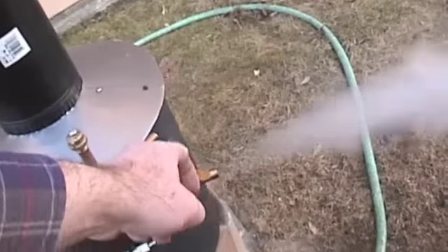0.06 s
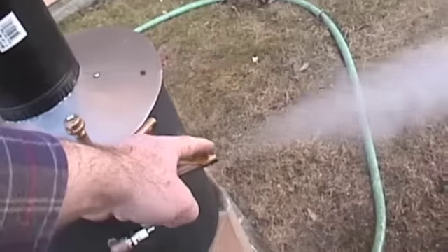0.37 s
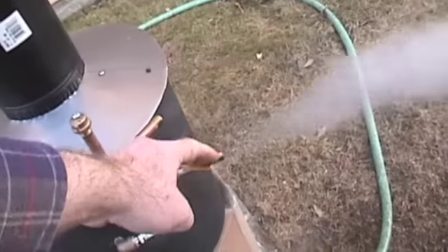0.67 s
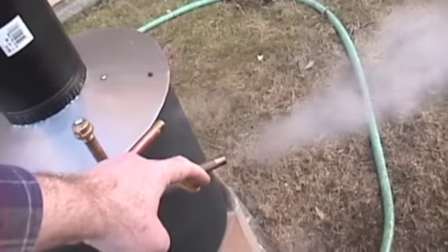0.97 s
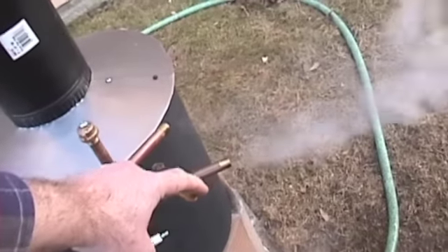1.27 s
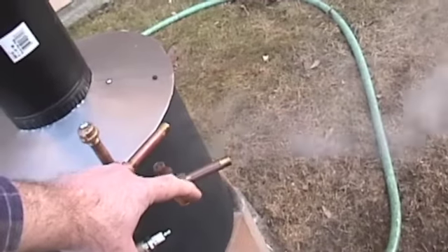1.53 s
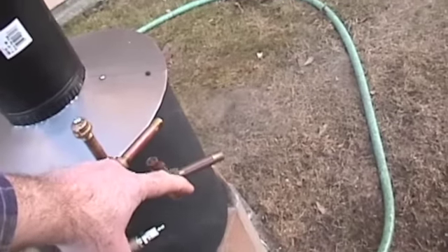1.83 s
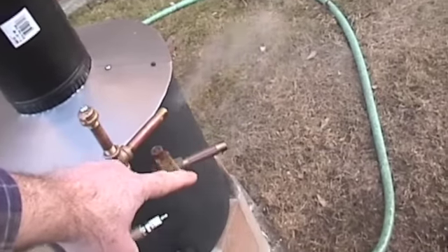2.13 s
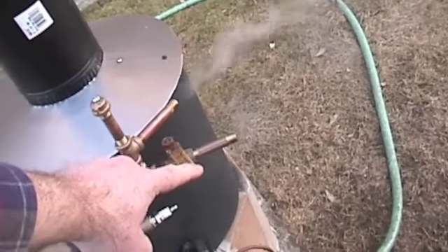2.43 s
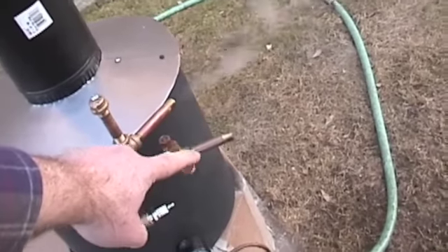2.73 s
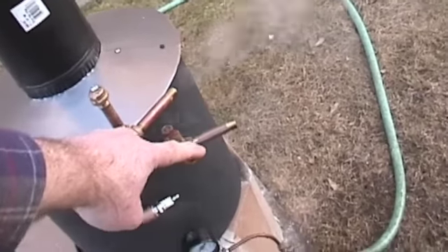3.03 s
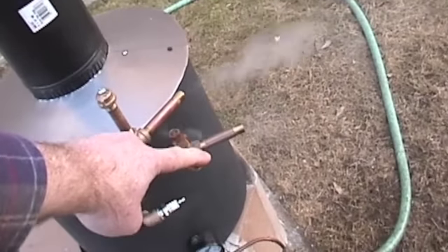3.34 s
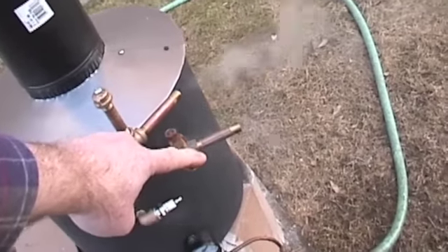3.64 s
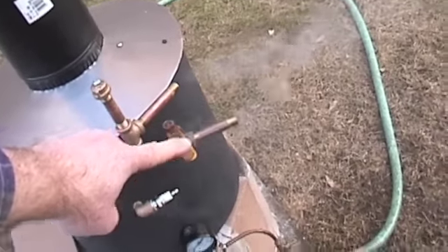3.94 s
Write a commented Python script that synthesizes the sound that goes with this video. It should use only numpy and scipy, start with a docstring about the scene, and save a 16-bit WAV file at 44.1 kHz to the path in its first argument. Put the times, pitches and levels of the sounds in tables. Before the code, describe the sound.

A jet of steam hisses close by, then thins to a faint steady leak.

```python
"""A roar of steam, close by, from the outlet pipe of a small boiler in a yard, with a quick echo off its shell.
A hand shuts the valve: the jet thins, brightens and dies by about 1.5 s. A small leak hisses on through
a fitting, spitting as the valve squeaks tight and whistling faintly as the pressure builds.
Behind it the burner flame murmurs, and light gusts buffet the stereo pair of microphones."""
import sys
import numpy as np
from scipy import signal
from scipy.fft import rfft, irfft
from scipy.io import wavfile

SR = 44100
rng = np.random.default_rng(int(sys.argv[2]) if len(sys.argv) > 2 else 0)


def unload_wav(signal):
    """Save mono or channel-first audio to the path in sys.argv[1] as 16-bit WAV at rate SR, clipped to [-1, 1]."""
    wavfile.write(
        sys.argv[1],
        SR,
        np.round(np.clip(np.atleast_2d(signal).T, -1, 1) * 32767).astype(np.int16),
    )


N = 176400
T, HZ = np.arange(N) / SR, np.fft.rfftfreq(N, 1 / SR)

# wind on the microphones (time [s], level [dB])
WIND_LEVEL = [(0, -57), (.2, -89), (.5, -45), (.8, -57), (1.2, -75), (2.45, -76), (2.68, -55), (2.715, -38),
              (2.81, -37.5), (2.84, -57), (3.17, -56), (3.21, -35), (3.26, -46), (3.3, -73), (4, -75)]
# rumble of the wind (frequency [Hz], relative level [dB])
WIND_SPECTRUM = [(15, -12), (35, -3), (80, 5), (150, 0), (250, -19), (600, -36), (2000, -65)]
# likeness of the wind at the two microphones (frequency [Hz], coherence [-1..1])
WIND_COHERENCE = [(30, -0.8), (200, -0.94)]
# sharp buffets on the left microphone (time [s], peak level [dB], pitch [Hz], rise and decay [s])
BUFFETS = [(.47, -35, 110, 0.0055), (.622, -31.5, 128, 0.0096), (2.711, -34, 80, .012),
           (2.777, -24.5, 160, 0.0037), (3.252, -18.5, 126, 0.0033), (3.4, -32, 90, .014),
           (3.526, -35.5, 80, .016)]

# burner in the background (time [s], level [dB])
BURNER_LEVEL = [(0, -55.5), (1.5, -55), (2.3, -53), (2.9, -51), (3.5, -50), (4, -45.5)]
# murmur of the flame (frequency [Hz], relative level [dB])
BURNER_SPECTRUM = [(25, -26), (60, -17), (110, -7), (165, -0.5), (260, -3), (380, -10.5), (560, -21),
                   (850, -21.5), (1500, -54)]
# likeness of the burner at the two microphones (frequency [Hz], coherence [-1..1])
BURNER_COHERENCE = [(30, .2), (90, 0.95), (170, 0.97), (300, 1)]

# squeaks of the valve stem (time [s], peak level [dB], half-length [s])
STEM_SQUEAKS = [(2.118, -53, 0.03), (2.198, -48, 0.021)]
# breathy whistle of the leak (time [s], level [dB])
WHISTLE_LEVEL = [(1.5, -68), (2.0, -55.5), (2.6, -59.5), (3.2, -51.5), (4, -52.5)]

# leak at the fitting (time [s], level [dB])
LEAK_LEVEL = [(0, -42), (1.55, -42), (1.8, -41), (2.0, -40.5), (2.3, -40), (2.6, -38.5), (3.2, -38),
              (4, -37)]
# hiss of the leak (frequency [Hz], relative level [dB])
LEAK_SPECTRUM = [(200, -8.5), (600, -3), (1000, 0.5), (1280, -2), (1650, -5.5), (2200, 0), (4500, 0.5),
                 (6800, -0.5), (9000, 0.5), (11500, 1.5), (13000, 3.5), (14000, -5), (15000, -7)]
# resonances of the fitting (frequency [Hz], width [Hz], level against the hiss [dB])
FITTING_MODES = [(1469, 65, 14), (1850, 150, 7), (2845, 77, 6.5), (3080, 230, 1), (3450, 110, 2.5),
                 (5820, 480, 9), (5990, 310, 6), (7990, 590, 7), (9800, 330, 5), (13000, 180, -8)]
# likeness of the leak at the two microphones (frequency [Hz], coherence [-1..1])
LEAK_COHERENCE = [(300, 0.68), (3300, 1), (5500, 0.89), (6500, 0.61), (8000, 0.7), (10000, .55),
                  (15000, 0.66)]
# place of the leak in the stereo image (frequency [Hz], left minus right [dB])
LEAK_BALANCE = [(400, 3), (1400, 2), (2000, -0.1), (5000, 0.7), (6400, 4), (7900, 4), (9200, 1.5),
                (11300, 1.6), (14000, 0.5)]
# phase of the leak between the microphones (frequency [Hz], left lead [rad])
LEAK_LEAD = [(1400, -0.3), (3000, -0.77), (5000, 0.37), (6300, 0.72), (7500, .1), (12500, .45), (15000, .2)]
# droplets spitting (time [s], level against the leak [dB], decay [s])
LEAK_SPITS = [(1.985, -3, .012), (2.046, 6.5, 0.034), (2.078, -2, 0.02), (2.104, -4, 0.0045),
              (2.152, 3, 0.02), (2.19, 0, .02), (2.249, -2, .007), (2.4, -7, .01)]
# tilt that turns the hiss into spray (frequency [Hz], relative level [dB])
SPRAY_TILT = [(500, -7), (1000, 6), (1500, -7), (3000, 3), (6000, 1.5), (8000, 1), (13000, 4.5)]

# steam jet by band (time [s], low mids [dB], high mids [dB], presence [dB], treble [dB], top [dB])
JET_LEVELS = [(0, -32.5, -26.5, -16.5, -21, -22.5), (0.15, -35.5, -26.5, -19.5, -19.5, -23.5),
              (0.33, -34, -27, -20, -20.0, -24), (0.55, -35.0, -27.5, -19.5, -21.5, -24.5),
              (0.73, -33.5, -26.5, -19, -20, -23), (0.79, -32.5, -26.5, -23, -19.0, -21.5),
              (0.87, -33.5, -29.5, -22.5, -19.5, -18), (0.93, -38.5, -34, -26.5, -23, -20.5),
              (1, -36.5, -35.5, -29, -24.5, -22.5), (1.09, -35, -36.5, -31, -28.5, -26),
              (1.15, -43, -37.5, -32.5, -30.5, -31), (1.22, -36.5, -37.5, -31.5, -30.5, -27.0),
              (1.29, -50.5, -42.5, -38, -37.5, -33), (1.39, -49.5, -44.5, -40.5, -41.0, -34.5),
              (1.44, -61, -56.5, -49, -45.0, -42), (1.5, -67, -58.5, -53.5, -49.0, -45.5)]
# crossovers between those five bands (frequency [Hz])
JET_CROSSOVERS = [1830, 3940, 5860, 9800]
# roar of the jet before each band gets its level (frequency [Hz], relative level [dB])
JET_SPECTRUM = [(60, -36), (280, -34), (480, -22), (750, -17.5), (1100, -11.5), (2000, -12), (2750, -9.5),
                (3600, -9), (4100, -4), (4450, -5.5), (4850, -4.5), (5600, -5), (6700, -6.5), (7450, -3),
                (8500, -7), (9400, -5.5), (9900, 0.5), (10400, 0.5), (11200, 4.5), (12400, 4), (13500, 0.5),
                (15000, -7)]
# resonances of the outlet pipe (frequency [Hz], width [Hz], level against the hiss [dB])
PIPE_MODES = [(738, 64, 0.5), (3420, 60, -10), (3800, 70, -9), (4070, 140, -2.5), (4450, 100, -9.5),
              (4746, 210, 2.5), (5160, 250, 1.5), (7400, 170, -6), (10990, 140, 4.5)]
# likeness of the jet at the two microphones (frequency [Hz], coherence [-1..1])
JET_COHERENCE = [(100, 0.79), (500, 1), (1300, 0.91), (2000, 1), (3300, 1), (4500, 0.92), (7000, 0.89),
                 (9500, 0.73), (12000, .94), (13500, 1)]
# place of the jet in the stereo image (frequency [Hz], left minus right [dB])
JET_BALANCE = [(200, 1.5), (1100, 1.5), (1600, -0.5), (3400, -1.5), (4100, -0.3), (6000, 1.6), (7700, 3.5),
               (8500, -0.5), (10000, 2.5), (11500, .1), (14000, 0)]

ECHO_S = .002698  # the path by way of the boiler shell is about 0.9 m longer
SIDES = np.array([[.5], [-.5]])  # shares a difference between left and right


def amp(db):
    """Decibels to gain."""
    return 10 ** (np.asarray(db) / 20)


def unit(x):
    """Scales to rms 1."""
    return x / np.sqrt(np.mean(x ** 2) + 1e-20)


def over_hz(points):
    """Reads a table on a log-frequency axis."""
    hz, value = np.transpose(points)
    return np.interp(np.log(HZ + 1), np.log(hz), value)


def over_time(points, column=1):
    """Reads one dB column of a level curve as a gain."""
    rows = np.array(points)
    return amp(np.interp(T, rows[:, 0], rows[:, column]))


def colour(points):
    """Reads a dB spectrum as a gain."""
    return amp(over_hz(points))


def balance(points):
    """Left and right gains for a level difference."""
    return amp(over_hz(points) * SIDES)


def white():
    """Spectrum of white noise."""
    return rfft(rng.standard_normal(N))


def stereo_noise(coherence):
    """Noise spectra at the left and right microphones, alike by the given coherence."""
    alike = np.clip(over_hz(coherence), -1, 1)
    left = white()
    right = alike * left + np.sqrt(1 - alike ** 2) * white()
    return np.array([left, right])


def wander(rate_hz):
    """Random motion of rms 1, up to about the given rate."""
    return unit(irfft(white() * HZ / (HZ + 2) / (1 + (HZ / rate_hz) ** 2), N))


def ringing(modes):
    """Gain of a set of resonances that stand out of a flat hiss."""
    peaks = sum(amp(db) ** 2 / (1 + (2 * (HZ - hz) / width) ** 2) ** 1.9 for hz, width, db in modes)
    return np.sqrt(1 + peaks)


def fuzzy_tone(hz, width_hz):
    """Noise in one narrow resonance, rms 1."""
    return unit(irfft(white() / (1 + (2 * (HZ - hz) / width_hz) ** 2), N))


def scatter(t60_s=0.07, low_cut_hz=1700):
    """Response of the treble reflections off nearby fittings, arm and ground."""
    taps = rng.standard_normal(N) * (T > ECHO_S) * np.exp(-np.log(1000) * T / t60_s)
    return rfft(taps / np.linalg.norm(taps)) * HZ / np.hypot(HZ, low_cut_hz)


def shell_echo(gain=.56, high_cut_hz=6940):
    """Response of one strong, duller reflection off the boiler shell."""
    return gain / (1 + (HZ / high_cut_hz) ** 6) * np.exp(-2j * np.pi * HZ * ECHO_S)


def wind(lumps_db=3.5, buffet_right_gain=-0.27):
    """Lumpy rumble and a few sharp buffets that push the two microphones in opposite ways."""
    rumble = unit(irfft(stereo_noise(WIND_COHERENCE) * colour(WIND_SPECTRUM), N))
    rumble *= over_time(WIND_LEVEL) * amp(lumps_db * wander(rate_hz=20))
    uneven_time = np.cumsum(1 + .25 * wander(rate_hz=80)) / SR  # roughens the pitch of the buffets
    buffets = np.zeros(N)
    for time, db, hz, decay in BUFFETS:
        envelope = amp(db) * np.exp(-abs(T - time) / decay)
        phase = 2 * np.pi * hz * (uneven_time - np.interp(time, T, uneven_time))
        buffets += envelope * np.sin(phase)
    return rumble + buffets * np.array([[1], [buffet_right_gain]])


def burner(flicker_db=1.34, right_db=-2.0):
    """Low, flickering murmur of the flame, a little left of centre."""
    murmur = unit(irfft(stereo_noise(BURNER_COHERENCE) * colour(BURNER_SPECTRUM), N))
    flicker = amp(flicker_db * wander(rate_hz=5.1))
    return murmur * over_time(BURNER_LEVEL) * flicker * amp([[0], [right_db]])


def valve():
    """The stem rubs in its seat and squeaks as it is tightened, dead centre."""
    rub = sum(amp(db) * np.exp(-((T - time) / half_s) ** 2) for time, db, half_s in STEM_SQUEAKS)
    return fuzzy_tone(hz=4190, width_hz=120) * rub


def whistle():
    """One resonance of the leak grows as the pressure builds."""
    return fuzzy_tone(hz=3222, width_hz=69) * over_time(WHISTLE_LEVEL)


def leak(flutter_db=0.58, fizz_db=1.0, spray_flutter_db=1.0, spit_rise_s=.012):
    """Thin hiss through the resonances of a fitting, slightly left; droplets make it fizz and spit."""
    microphones = balance(LEAK_BALANCE) * np.exp(1j * over_hz(LEAK_LEAD) * SIDES)
    path = microphones * colour(LEAK_SPECTRUM) * ringing(FITTING_MODES) * (1 + 0.23 * scatter())
    hiss = unit(irfft(stereo_noise(LEAK_COHERENCE) * path, N))
    hiss *= amp(flutter_db * wander(rate_hz=15) + fizz_db * wander(rate_hz=990))
    spray = unit(irfft(stereo_noise(LEAK_COHERENCE) * path * colour(SPRAY_TILT), N))
    spray *= amp(-spray_flutter_db * wander(rate_hz=490))
    spits = np.zeros(N)
    for start, db, decay in LEAK_SPITS:
        rise = np.clip((T - start) / spit_rise_s, 0, 1)
        fall = np.exp(-np.maximum(T - start - spit_rise_s, 0) / decay)
        spits += amp(db) * rise * fall
    return (hiss + spray * spits) * over_time(LEAK_LEVEL)


def jet(flutter_db=0.45, sputter_db=0.72, shut_s=1.505, shut_fade_s=0.018):
    """Turbulent steam from the pipe: eddies shake each band, and the lows die first as the valve shuts."""
    steam = stereo_noise(JET_COHERENCE) * colour(JET_SPECTRUM) * ringing(PIPE_MODES)
    yard = 1 + shell_echo() + 0.27 * scatter()
    at_microphones = steam * yard * balance(JET_BALANCE)
    lowpasses = [1 / (1 + (HZ / hz) ** 20) for hz in JET_CROSSOVERS]
    bands = np.diff(lowpasses, axis=0, prepend=0, append=1)
    sputter = amp(sputter_db * wander(rate_hz=760))  # shared by all bands
    roar = np.zeros((2, N))
    for column, band in enumerate(bands, start=1):
        hiss = unit(irfft(at_microphones * band, N))
        flutter = amp(flutter_db * wander(rate_hz=66))
        roar += hiss * over_time(JET_LEVELS, column) * flutter
    shut_off = np.exp(-np.maximum(T - shut_s, 0) / shut_fade_s)
    return roar * sputter * shut_off


def scene():
    """The yard from one microphone position beside the boiler."""
    return wind() + burner() + valve() + whistle() + leak() + jet()


def record(dry):
    """The recorder's band limit: a steep cut of the highest treble."""
    lowpass = signal.firwin(401, cutoff=15550, window=("kaiser", 9), fs=SR)
    return signal.oaconvolve(dry, lowpass[None], "same")


dry = scene()
out = record(dry)
unload_wav(out)
```